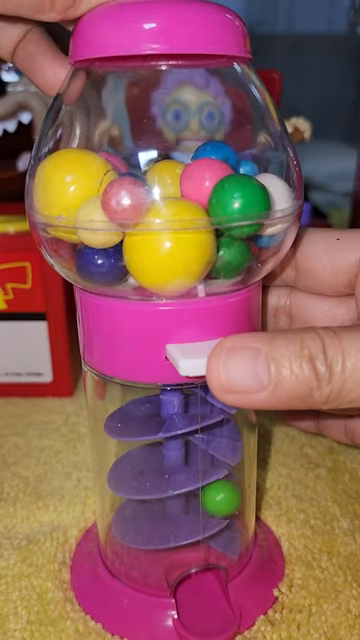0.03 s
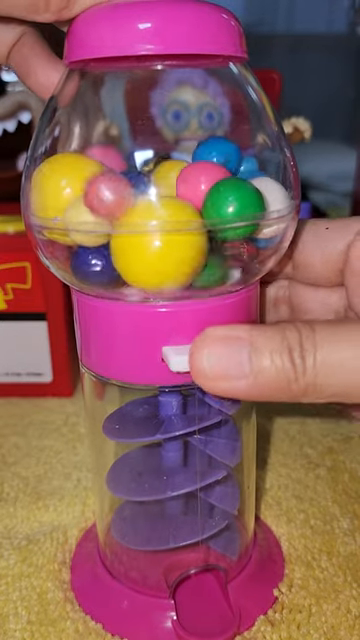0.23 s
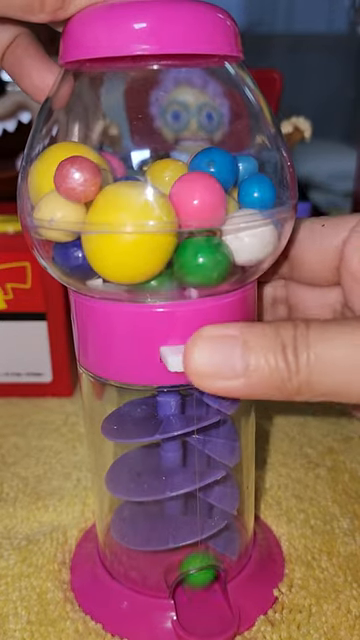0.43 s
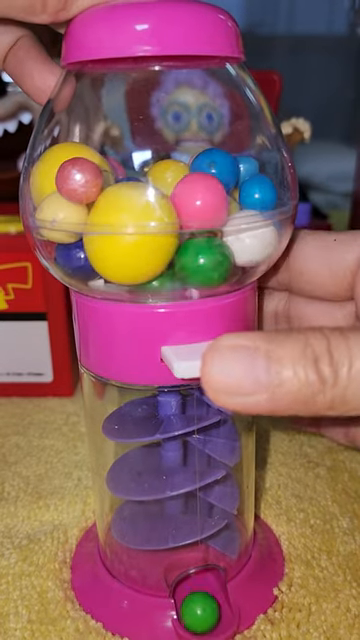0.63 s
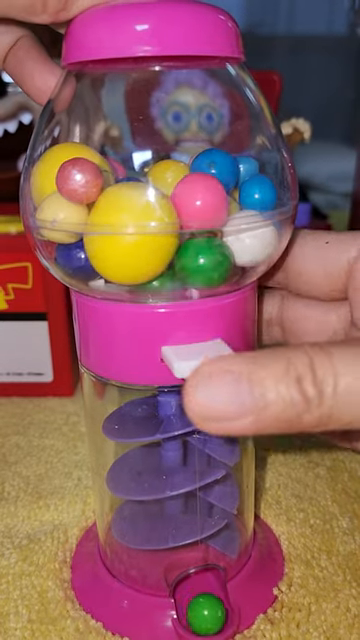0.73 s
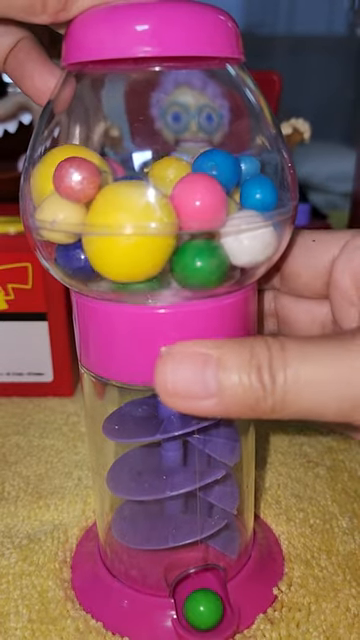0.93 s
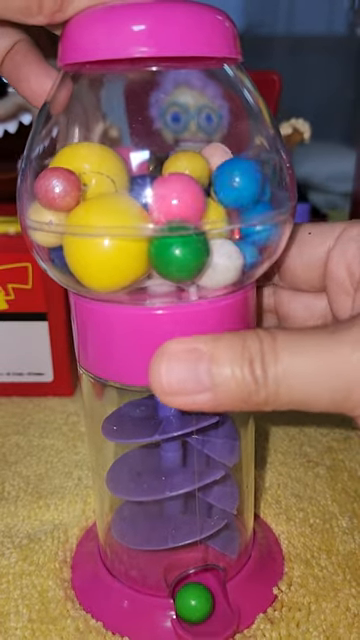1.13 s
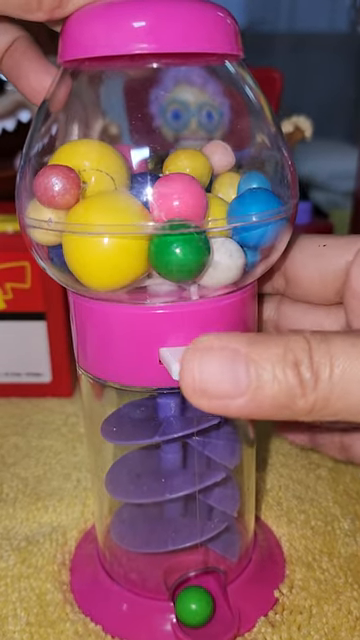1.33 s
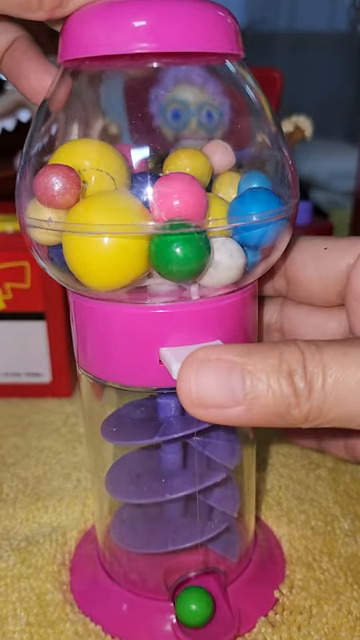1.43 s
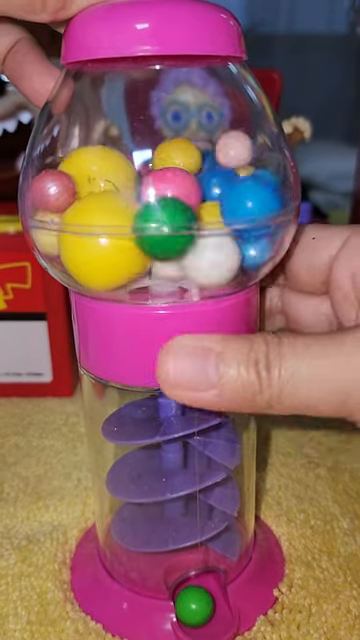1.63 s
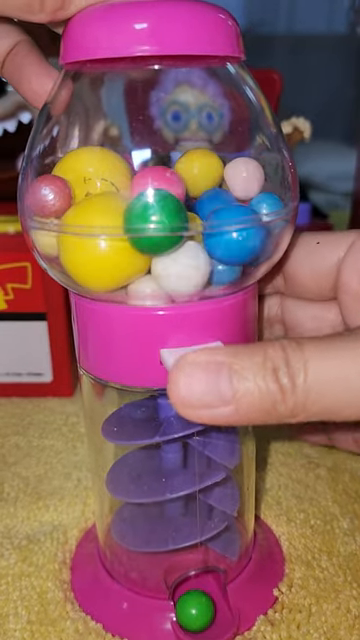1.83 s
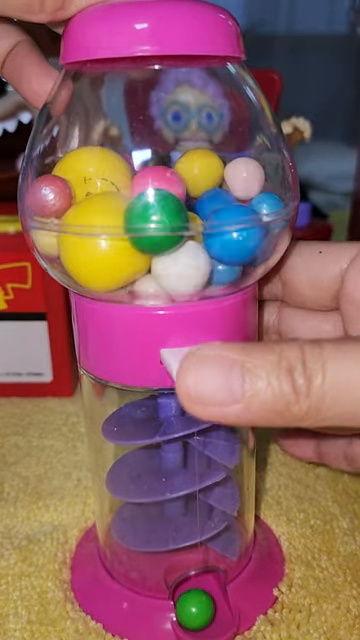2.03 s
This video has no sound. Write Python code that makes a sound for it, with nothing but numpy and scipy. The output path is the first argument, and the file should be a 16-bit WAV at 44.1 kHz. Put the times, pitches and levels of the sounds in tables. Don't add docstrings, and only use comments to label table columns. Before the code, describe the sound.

A plastic toy gumball machine is worked by its lever, heard close in a small quiet room. A ball rattles lightly down the hollow spiral at the start. Grinding, knocking pushes come at about 0.2, 0.95 and 1.6 seconds, with sharp ringing snaps back at 0.5, 1.2 and 1.8. The ball clicks into the tray just before the first snap. Soft hand brushing and low room hush remain.

```python
import sys
import numpy as np
from scipy import signal
from scipy.fft import rfft, irfft
from scipy.io import wavfile
from scipy.ndimage import uniform_filter1d

SR = 44100
rng = np.random.default_rng(int(sys.argv[2]) if len(sys.argv) > 2 else 0)


def generate_wav(signal):
    frames = np.transpose(np.atleast_2d(signal))
    scaled = np.clip(frames, -1, 1) * 32767
    pcm = np.round(scaled).astype(np.int16)
    wavfile.write(sys.argv[1], SR, pcm)


def linear_from_db(decibels):
    return 10 ** (np.asarray(decibels, float) / 20)


N = 92610


def high(x, hz):
    return signal.lfilter(*signal.butter(2, hz, "high", fs=SR), x)


def low_pass(x, hz):
    return signal.lfilter(*signal.butter(2, hz, fs=SR), x)


def unit(x):
    return x / np.sqrt(np.sum(x ** 2) / len(np.atleast_2d(x)) + 1e-30)


def conv(x, h):
    return signal.fftconvolve(np.atleast_2d(x), np.atleast_2d(h), axes=1)[:, :N]


def on_bins(table, size):
    hz, value = np.array(table).T
    bin_hz = np.arange(size // 2 + 1) * SR / size
    return np.interp(np.log(bin_hz + 1), np.log(hz), value)


def shape(x, db, rad=0.):
    return irfft(rfft(x) * linear_from_db(db) * np.exp(1j * rad), x.shape[-1])


def walk(rate):
    hold = int(SR / rate)
    steps = np.repeat(rng.standard_normal(N // hold + 1), hold)
    return 0.47 * uniform_filter1d(steps, hold)[:N]


def pair(size):
    unlike, alike_below_hz = 0.6, 770
    n = rng.standard_normal((3, size))
    swap = (np.sqrt(1 - unlike) - 1) * n[0] + np.sqrt(unlike) * n[1:]
    return n[0] + high(swap, alike_below_hz)


def ring(modes, rise_s=1e-4):
    t = np.arange(16384) / SR
    h = sum(linear_from_db(db) * np.sin(2 * np.pi * hz * t) * np.exp(-np.log(1000) * t / t60) for hz, db, t60 in modes)
    return unit(h * (1 - np.exp(-t / rise_s)))


def crack(colour):
    cepstrum = irfft(on_bins(colour, size=1024) * np.log(10) / 20)
    cepstrum[1:512] *= 2
    cepstrum[513:] = 0
    return unit(irfft(np.exp(rfft(cepstrum))))


# pitch in Hz, level in dB, t60 in seconds.
TUBE_RING = [(607, -11.5, 0.05), (672.4, 0.5, 0.034), (760.3, -19.5, 0.24), (788.4, 1.5, 0.047),
             (811, -7, 0.064)]


def body(drive, colour, modes, ring_db, strike=None):
    shell, tube = drive
    tube_rise_s, ring_to_room_db = 0.0074, -4
    dry = conv(shell, crack(colour)) + conv(tube, ring(TUBE_RING, tube_rise_s))
    rung = linear_from_db(ring_db) * conv(shell if strike is None else strike, ring(modes))
    return np.array([dry + rung, dry + linear_from_db(ring_to_room_db) * rung])


def chatter(decay_s):
    t = np.arange(512) / SR
    env = np.exp(-t / decay_s) * np.minimum(t / decay_s * 5, 1)
    burst = pair(size=512) * env
    for _ in range(3):
        white = irfft(np.exp(1j * np.angle(rfft(burst))))
        burst = env ** .3 * white
    return burst


def touch(burst, spot_hz, bright_db):
    soft_hz, spot_width_hz, spot_db = 5000, 300, 1
    top = high(burst, soft_hz)
    spot = signal.lfilter(*signal.iirpeak(spot_hz, spot_hz / spot_width_hz, fs=SR), burst)
    return unit(low_pass(burst, soft_hz)) + linear_from_db(bright_db - 2.0) * unit(top) + linear_from_db(spot_db) * unit(spot)


def blows(table, decay_s):
    shell, tube = np.zeros((2, N)), np.zeros(N)
    for start_s, db, tube_db, *spot in table:
        burst = chatter(decay_s)
        sign = np.sign(burst[0, 9])
        if spot:
            burst = touch(burst, *spot)
        i = int(start_s * SR)
        shell[:, i:i + 512] += linear_from_db(db) * 6 * unit(high(burst, 220))
        tube[i] += linear_from_db(db + tube_db) * 10 * sign
    return shell, tube


# start in seconds, level in dB, share in the tube in dB.
LEVER_SNAPS = [
    (0.4861, -5.5, -19.5),
    (1.1872, -5, -22),
    (1.8143, -5, -27.5),
]
LEVER_RING_DB = [
    2.5,
    2,
    1,
]
# pitch in Hz, level in dB, t60 in seconds.
LEVER_RING = [(130, -17, 0.092), (1317, -1, 0.077), (1700, 1.5, 0.069), (1695, -9, 0.14),
              (3000, -8.5, 0.029), (4100, -0.5, 0.034), (5060, -4.5, .03), (5464, -1.5, 0.058)]
# frequency in Hz, level in dB.
HARD_CRACK = [(180, -27.5), (300, -42), (1560, 2.5), (3580, -3.5), (5340, -4.5), (7080, -6), (12700, 2.5),
              (16000, -5)]


def lever_snaps():
    snap_s = 0.0039
    strike = np.zeros(N)
    for (start_s, db, _), ring_db in zip(LEVER_SNAPS, LEVER_RING_DB):
        strike[int((start_s + snap_s / 4) * SR)] = 6 * linear_from_db(db + ring_db)
    return body(blows(LEVER_SNAPS, snap_s), HARD_CRACK, LEVER_RING, -7.5, strike)


def grains():
    per_s, spread_db, grain_s, ceiling = 810, 3.5, 0.00089, 2.8
    sizes = linear_from_db(spread_db * np.minimum(rng.exponential(size=N), 4))
    slips = (rng.random(N) < per_s / SR) * sizes
    grain = signal.lfilter([1], [1, -np.exp(-1 / (grain_s * SR))], slips)
    return np.tanh(grain / np.sqrt(np.mean(grain ** 2)) / ceiling) * ceiling


# lower edge in Hz, upper edge in Hz.
SLIP_BANDS = [
    (80, 1500),
    (1500, 3200),
    (3200, 6500),
    (6500, 18000),
]
# frequency in Hz, level in dB.
GRIND_TONE = [(130, -4), (450, -2), (1000, -11.5), (2000, 6.5), (4500, -4.5), (8000, -11), (12000, -8.5),
              (16000, -22)]
# pitch in Hz, level in dB, t60 in seconds.
GLOBE_RING = [(1394, -5, 0.16), (1769, 10.5, 0.03), (2178, 16.5, 0.0048), (2830, -7, 0.022),
              (3110, -12, 0.051), (3920, -2, 0.022), (5620, -17, 0.045), (6740, -21, 0.087)]


def friction(curves):
    t, own = np.arange(N) / SR, 0.76
    shared, flutter = grains(), linear_from_db(4 * walk(120))
    crunch = 0
    for band in SLIP_BANDS:
        slips = (1 - own) * shared + own * grains()
        crunch = crunch + slips * signal.lfilter(*signal.butter(1, band, "band", fs=SR), pair(size=N))
    shell, tube = 0, 0
    for curve in curves:
        start_s, level_db, tube_db = np.array(curve).T
        db = np.interp(t, start_s, level_db, left=-120, right=-120)
        shell = shell + linear_from_db(db)
        tube = tube + linear_from_db(db + np.interp(t, start_s, tube_db))
    drive = linear_from_db(0.5) * shell * flutter * crunch, linear_from_db(-8.5) * tube * flutter * rng.standard_normal(N)
    return body(drive, GRIND_TONE, GLOBE_RING, -3.5)


# time in seconds, grinding level in dB, share in the tube in dB.
LEVER_PUSHES = [
    [(.215, -50, -17), (.23, -29.5, 1.5), (.26, -32.5, 11), (.285, -22.5, -4.5), (.32, -34, -5.5),
     (.37, -49, 21), (.42, -46.5, -5.5), (.465, -52.5, 3)],
    [(.885, -65.5, -16), (.9, -51.5, -5), (.945, -48, 22.5), (.962, -21.5, -6.5), (.987, -30, -22),
     (1.005, -23, -15), (1.06, -34, -8.5), (1.09, -67, -5), (1.18, -52, -6)],
    [(1.56, -61.5, 10), (1.6, -33, 9.5), (1.64, -23, -18.5), (1.66, -27, 4), (1.7, -31, 5.5),
     (1.725, -43, -28), (1.75, -67, -22), (1.81, -44, 19)],
]


def lever_grind():
    return friction(LEVER_PUSHES)


# start in seconds, level in dB, share in the tube in dB, ring of the spot in Hz, brightness in dB.
GLOBE_KNOCKS = [(0.2229, -19, -10, 4050, -30.5), (0.2352, -25.5, 3, 2410, -31),
                (0.2697, -11, -3, 1910, -19.5), (0.3261, -21.5, 1.5, 1800, -18.5),
                (.892, -55, -22, 7120, -8.5), (0.8965, -33.5, -18, 2130, -8), (.9115, -53, 2, 2260, -14),
                (0.9324, -38.5, 3.5, 4100, -8.5), (0.9588, -18.5, -11, 3160, -1),
                (0.9695, -22.5, -24, 1750, -23.5), (0.9915, -10, -6, 4060, 10),
                (1.017, -13.5, -21, 3100, -26), (1.1435, -35.5, -8, 2360, -14),
                (1.2992, -15.5, -27, 4050, 6.5), (1.304, -17, -12, 2690, -25),
                (1.5319, -42.5, -21, 7040, -8), (1.5515, -44.5, -2.5, 4090, -7),
                (1.5802, -45, 4, 2110, -14), (1.6076, -20, -2.5, 4070, -12), (1.627, -20.5, 4, 2700, -17),
                (1.6587, -13, -15.5, 2640, -8.5), (1.683, -17.5, -2.5, 2560, -20.5),
                (1.702, -14, -7, 2670, -0.5), (1.7698, -30.5, -23, 2140, -19), (2.0764, -59, 7, 1778, -5)]
# start in seconds, level
# in dB, share in the tube in dB, ring of the spot in Hz, brightness in dB.
MORE_GLOBE_KNOCKS = [(.2255, -26, 6.5, 4540, -24.5), (.254, -24.5, 3, 5800, -17),
                     (.2745, -15.5, -19, 1846, -30), (.286, -23, 6.5, 1900, -20),
                     (.312, -21, -17.5, 4110, -18.5), (.350, -43, -9.5, 5550, -15.5),
                     (.4052, -23.5, -22, 3000, -10), (.7275, -54, 4.5, 3000, -20), (.8635, -52, -6, 1700, -15),
                     (.9622, -21, 0, 3100, -28), (.9845, -19, -19.5, 4050, -20), (.9942, -15.5, 1.5, 4960, -9),
                     (1.008, -18.5, -24, 3510, -20.5), (1.0435, -28, -10, 2700, -24),
                     (1.05, -27.5, -25, 3520, -25), (1.0572, -19, -11.5, 2600, -17.5),
                     (1.066, -35.5, 8.5, 2470, -21), (1.3, -22.5, -36.5, 630, -33.5),
                     (1.5943, -40, -8.5, 1735, -15), (1.6177, -20, -14, 1710, -23.5),
                     (1.636, -11.5, -33, 2760, -25.5), (1.641, -15.5, -22, 3000, -22.5),
                     (1.6455, -18.5, 0.5, 1440, -29), (1.6885, -22.5, -2.5, 2460, -6.5),
                     (1.6975, -26, -28, 4460, -23)]
# start in seconds, level in dB, share in the tube in dB, ring of the spot in Hz, brightness in dB.
SPIRAL_HITS = [(0.0074, -34.5, -32, 4800, -18), (.0105, -42, -3, 5450, -20), (0.0398, -32, -2, 1910, -27.5),
               (.0436, -30.5, -12, 5440, -4.5), (.073, -35, -19.5, 3550, -25),
               (.0915, -31.5, -11.5, 1690, -23), (.131, -55.5, -23.5, 2300, -26),
               (.174, -38, -16.5, 1700, -20), (.1865, -37, -20.5, 5200, -22.5),
               (.196, -43.5, -16.5, 1900, -25), (.206, -51.5, -24.5, 1783, -19),
               (.2145, -51, -16, 4000, -25), (0.0811, -24.5, -7, 5620, 6),
               (0.1096, -24.5, -11.5, 1900, -27), (0.1215, -28.5, -4, 1940, -0.5),
               (0.1446, -30, -26, 5530, -17), (0.1602, -37.5, -5, 1590, -29),
               (0.184, -29.5, -26, 1550, -2.5), (0.3719, -24, -3.5, 5840, 1),
               (0.4085, -24, -23, 2440, -0.5), (.501, -22.5, -19.5, 1675, -19),
               (.512, -21.5, -13.5, 1750, -17), (0.5726, -27.5, -16, 2190, -19),
               (0.6681, -32, -12, 1684, 0)]


def ball_knocks():
    colour = [(200, -4.0), (1000, 11.0), (3000, 11.5), (16000, 10.5)]  # Hz, dB
    hits = list(SPIRAL_HITS) + list(GLOBE_KNOCKS) + list(MORE_GLOBE_KNOCKS)
    return body(blows(hits, .003), colour, GLOBE_RING, -11)


# start in seconds, level in dB, share in the tube in dB, ring of the spot in Hz, brightness in dB.
TRAY_LANDING = [
    (.4719, -5, -28, 3890, -9),
    (.4752, -14, -20.5, 2463, -26),
]


def ball_landing():
    return body(blows(TRAY_LANDING, .0006), HARD_CRACK, GLOBE_RING, -11)


# time in seconds, rumble in dB, hum in the tube in dB, hum pitch in Hz.
SPIRAL_ROLL = [
    (0, -40.5, -39.5, 838.3),
    (0.078, -51.5, -40.5, 843.6),
    (0.148, -42.5, -48.5, 818),
    (0.219, -40.5, -48, 760),
]


def roll_rumble():
    return friction([[(s, db - 1.5, -8) for s, db, *_ in SPIRAL_ROLL]])


def roll_hum():
    t, width_hz = np.arange(N) / SR, 110
    time_s, _, hum_db, pitch_hz = np.array(SPIRAL_ROLL).T
    slow = low_pass(rng.standard_normal((2, N)), width_hz / 2)
    turn = np.exp(2j * np.pi * np.cumsum(np.interp(t, time_s, pitch_hz)) / SR)
    hum = ((slow[0] + 1j * slow[1] + 2 * slow.std()) * turn).real
    fade_db = 790 * np.maximum(t - time_s[-1], 0)
    return hum / hum.std() * linear_from_db(np.interp(t, time_s, hum_db) - fade_db)


# start in seconds, length in seconds, hiss in dB, hum in the tube in dB.
HAND_SHIFTS = [
    (1.421, 0.2, -54, -73),
    (1.83, 0.32, -86, -65),
]
# frequency in Hz, level in dB.
CLOTH_TONE = [(1000, -3), (4000, -3.5), (7000, -5), (12000, -8), (16000, -10)]


def hand_brush():
    t = np.arange(N) / SR
    env = np.array([(t > s) * np.exp(-np.abs(t - s) / length) for s, length, *_ in HAND_SHIFTS])
    hiss, hum = linear_from_db(np.array(HAND_SHIFTS)[:, 2:].T) @ env
    cloth = conv(hiss * rng.standard_normal((2, N)), crack(CLOTH_TONE))
    return cloth + conv(hum * rng.standard_normal(N), ring(TUBE_RING))


# frequency in Hz, level in dB.
ROOM_TONE = [(300, 9), (690, -9), (790, -1.5), (1000, -6.5), (1700, -5.5), (3500, -7), (7000, -2.5),
             (14000, -10)]


def room(x):
    t, echo_s = np.arange(SR // 2) / SR, 0.013

    def fade(t60):
        return np.exp(-np.log(1000) * t / t60)

    n = pair(size=len(t))
    top = high(n, 1800)
    late = (n - top) * fade(0.45) + top * fade(0.4)
    early = pair(size=len(t)) * fade(0.11)
    h = linear_from_db(-9) * unit(late) + linear_from_db(-2.5) * unit(early)
    h = h * np.clip(t / echo_s, 0, 1) ** 2
    h[:, int(echo_s * SR)] += linear_from_db(-25.5)
    return shape(conv(x, h), on_bins(ROOM_TONE, size=N))


# frequency in Hz, difference in dB.
PORT_LEVEL = [(400, 0), (750, -3), (1100, 0.5), (3500, 1.5), (5800, 10), (8300, 12), (10000, -5),
              (12800, 5)]
# frequency in Hz, phase in radians.
PORT_PHASE = [(350, 0), (900, .6), (1700, 2), (3400, 6.8), (5400, 6.2), (6700, 13), (9600, 40), (15300, 58)]


def phone_ports(x):
    half = np.array([[.5], [-.5]])
    return shape(x, half * on_bins(PORT_LEVEL, size=N), half * on_bins(PORT_PHASE, size=N))


# frequency in Hz, level in dB.
HUSH_TONE = [(20, -51), (40, 7), (55, -3), (125, -8), (300, -16), (500, -37), (3000, -36), (16000, -48.5)]


def room_hush():
    n = rng.standard_normal((3, N))
    low = low_pass(n, 700)
    rumble = (low[0] + 0.044 * low[1:]) * linear_from_db(0.37 * walk(5.4))
    x = shape(rumble + n[1:] - low[1:], on_bins(HUSH_TONE, size=N))
    return x * linear_from_db(-52) / np.sqrt(np.mean(x ** 2))


def scene():
    toy = lever_snaps() + lever_grind() + ball_knocks() + ball_landing()
    near, to_room = toy + roll_rumble() + roll_hum() + hand_brush()
    return phone_ports(near + room(to_room)) + room_hush()


def band_limit(x):
    return signal.sosfilt(signal.butter(12, 16500, fs=SR, output="sos"), x)


def record(dry):
    top_cut = signal.butter(10, 15200, fs=SR, output="sos")
    dull = signal.sosfilt(top_cut, high(dry, 40))
    mix = np.clip(dull, -1, 1)
    return band_limit(mix)


dry = scene()
out = record(dry)
generate_wav(out)
```